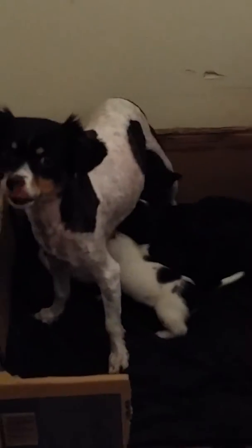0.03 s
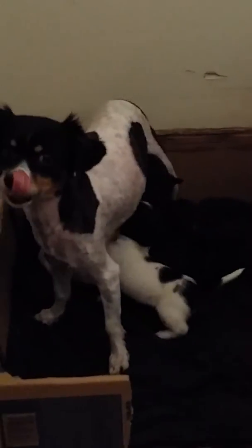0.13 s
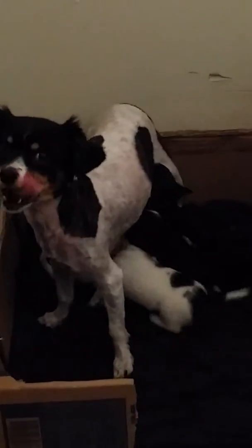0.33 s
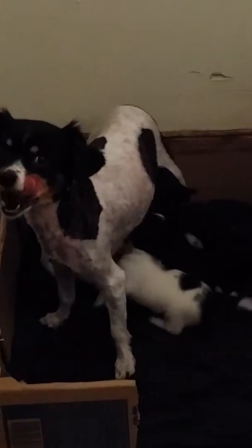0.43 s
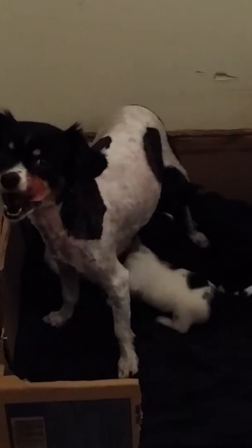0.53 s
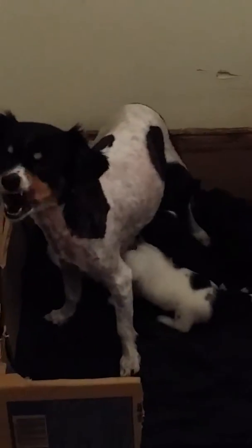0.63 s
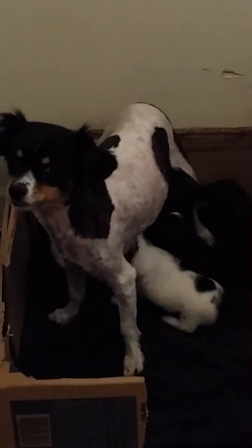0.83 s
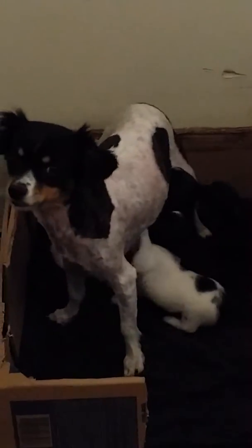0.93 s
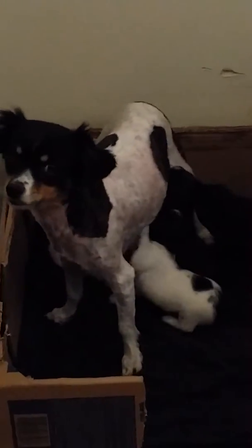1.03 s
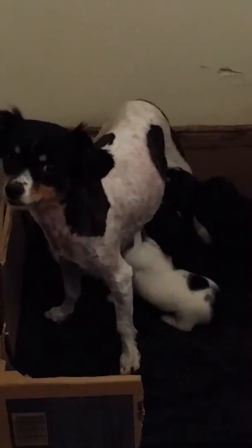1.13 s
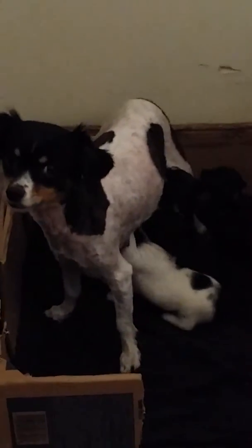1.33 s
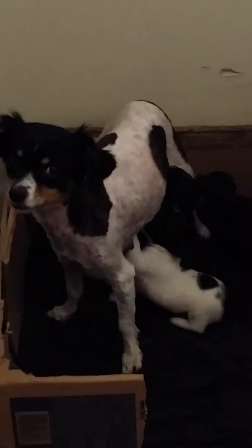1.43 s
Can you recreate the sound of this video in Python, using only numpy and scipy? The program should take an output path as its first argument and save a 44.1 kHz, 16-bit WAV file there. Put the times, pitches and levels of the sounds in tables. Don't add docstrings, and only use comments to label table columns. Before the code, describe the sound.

A puppy gives one high, thin squeal, then snorts a small puff of air indoors

```python
import sys
import numpy as np
from scipy import signal
from scipy.fft import rfft, irfft
from scipy.io import wavfile

SR = 44100
rng = np.random.default_rng(int(sys.argv[2]) if len(sys.argv) > 2 else 0)


def invert_db(x):
    u = np.asarray(x, float) / 20
    return 10 ** u


def wrap_up_sound(samples):
    columns = np.atleast_2d(samples).T
    tamed = np.clip(columns, -1, 1)
    steps = np.round(tamed * 32767).astype(np.int16)
    wavfile.write(sys.argv[1], SR, steps)


N = 66150
T = np.arange(N) / SR
PAN_DB = -3


def rms_one(x):
    return x / np.sqrt(np.mean(x ** 2) + 1e-20)


def in_time(rows):
    s, *columns = np.transpose(rows)
    return [np.interp(T, s, c) for c in columns]


def at_hz(points, hz):
    point_hz, value = np.array(points).T
    return np.interp(np.log(hz), np.log(point_hz), value)


def pan(db):
    return invert_db(np.array([db / 2, -db / 2])).reshape(2, -1)


def drift(rate_hz):
    r = np.exp(-80 * np.pi * rate_hz / SR)
    slow = signal.lfilter([1], [1, -2 * r, r * r], rng.standard_normal(N // 40 + 502))
    slow = slow[500:]
    return np.interp(np.arange(N) / 40, np.arange(len(slow)), rms_one(slow))


# (frequency [Hz], likeness [-1..1])
EAR_LIKENESS = [(30, 0.64), (100, .9), (300, 0.65), (1000, -0.15), (4000, 0.1), (12000, 0.22)]


def noise(spectrum, patchy_db):
    hz = np.maximum(np.fft.rfftfreq(N, 1 / SR), 10)
    alike = np.clip(at_hz(EAR_LIKENESS, hz), -1, 1)
    mid, side = rfft(rng.standard_normal((2, N))) * invert_db(at_hz(spectrum, hz))
    both = np.sqrt(1 + alike) * mid + np.sqrt(1 - alike) * side * [[1], [-1]]
    place = 2 * np.log2(hz / 20)
    shared = drift(6.8)
    out = 0
    for k in range(21):
        band = irfft(both * np.maximum(1 - abs(place - k), 0), N)
        out = out + band * invert_db(patchy_db * (shared + drift(19)))
    return rms_one(out)


def swell(s, attack_s, release_s):
    return np.exp(-.5 * ((T - s) / np.where(T < s, attack_s, release_s)) ** 2)


# (time [s], level [dB], mouth opening [0..1], head turn [-1..1])
SQUEAL_COURSE = [
    (.118, -55, 0.8, -0.7),
    (.185, -48.5, 0.13, -1),
    (.225, -39.5, 0.27, 0.47),
    (.3, -38, 0.11, -0.29),
    (.43, -38, 0.37, 0.18),
    (.54, -37, 0.84, .6),
    (.63, -40, 0.8, 0.17),
    (.675, -44.5, 0.71, -.1),
    (.715, -49.5, 0.7, -.1),
]
# (time [s], second partial [Hz])
SQUEAL_PITCH = [(.118, 1905), (.185, 1926), (.215, 1962), (.258, 1962), (.285, 1941), (.43, 1939),
                (.63, 1928), (.68, 1862), (.715, 1868)]
# (multiple, level [dB], open-mouth gain [dB], left-right [dB], left-right swing with head turn [dB])
SQUEAL_PARTIALS = [(1, -4, 0.6, -1, -4.5), (2, -1.7, -1.5, -15, -8.5), (3, -13, 19.5, -5, -10),
                   (4, -16, 3, -3, -0.5), (5, -20, 18, 2, 3.5), (6, -12.5, -15.5, -4.5, 9),
                   (7, -6.5, -12.5, 9, 1.7), (8, -1.5, -6.5, -5.5, 6.5), (9, -20, 11.5, -5, -4.5),
                   (10, -32.5, 6, 8, -8.4), (11, -32, 2, -11.5, -2.2), (12, -36.5, -0.5, -2.5, -4.3),
                   (13, -32.5, -1.5, -5.5, -7.5), (14, -25, 4.5, -5, -0.7), (15, -29, -2, -2, 1.7)]
# (frequency [Hz], density [dB per Hz])
BREATH_SPECTRUM = [(300, -26), (700, -13), (1300, -0.2), (2500, -2.5), (4000, -14.5), (7500, -1),
                   (11000, -17), (14500, -16.5)]
JITTER, JITTER_RATE_HZ = .0022, 55
SHIMMER, SHIMMER_RATE_HZ = .16, 30
BREATH_DB, BREATH_OPEN_MOUTH_DB = -15, -11
BREAK_S, BREAK_ROUGH, STEADY = .64, 3.5, .5


def squeal():
    (hz,), (db, mouth, turn) = in_time(SQUEAL_PITCH), in_time(SQUEAL_COURSE)
    fade_in = np.clip((T - SQUEAL_COURSE[0][0]) / .01, 0, 1)
    fade_out = np.clip((SQUEAL_COURSE[-1][0] - T) / .01, 0, 1)
    crack = BREAK_ROUGH * np.clip((T - BREAK_S) / .03, 0, 1)
    rough = 1 - STEADY * np.clip(mouth, 0, 1) + crack
    jittered_hz = hz * (1 + JITTER * rough * drift(JITTER_RATE_HZ))
    phase = np.pi * np.cumsum(jittered_hz) / SR
    out = invert_db(BREATH_DB + BREATH_OPEN_MOUTH_DB * mouth) * noise(BREATH_SPECTRUM, patchy_db=1.5) * pan(PAN_DB)
    for k, level_db, open_db, pan_db, turn_db in SQUEAL_PARTIALS:
        k = round(k)
        chance = np.array([drift(SHIMMER_RATE_HZ) + 1j * drift(SHIMMER_RATE_HZ) for ear in "LR"])
        fading = 1 + SHIMMER * np.sqrt(rough * (k - .8)) * chance
        start = rng.uniform(0, 2 * np.pi) + np.array([[0], [1]]) * rng.normal(0, 0.65) * (k - 1)
        tone = np.imag(fading * np.exp(1j * (k * phase + start)))
        gain = np.sqrt(2) * invert_db(level_db + open_db * mouth)
        out = out + gain * pan(pan_db + turn_db * turn) * tone
    return out * invert_db(db) * fade_in * fade_out


# (time [s], level [dB], attack [s], release [s])
PUFF_EVENTS = [
    (0.1446, -53, 0.0029, .012),
    (0.33, -53.5, 0.0151, 0.022),
    (.709, -47.5, 0.0025, 0.023),
    (0.773, -37.5, 0.029, .034),
    (1.026, -57.5, 0.032, .022),
    (1.122, -57, 0.0024, .018),
    (1.48, -65, 0.0026, .03),
]
# (frequency [Hz], density [dB per Hz])
PUFF_SPECTRUM = [(500, -17.5), (1200, -23), (1900, -0.5), (2500, -5.5), (5000, -7), (7600, 2),
                 (12000, -0.3), (14800, -6.5)]


def puffs():
    level = sum(invert_db(db) * swell(s, attack_s, release_s) for s, db, attack_s, release_s in PUFF_EVENTS)
    return level * noise(PUFF_SPECTRUM, patchy_db=1.96) * pan(-7)


WHIMPER_S, WHIMPER_LENGTH_S = 1.02, 0.023
WHIMPER_HZ, WHIMPER_WIDTH_HZ, WHIMPER_DB = 1667, 110, -62


def whimper():
    edges_hz = [WHIMPER_HZ - WHIMPER_WIDTH_HZ / 2, WHIMPER_HZ + WHIMPER_WIDTH_HZ / 2]
    band = signal.butter(2, edges_hz, "band", fs=SR, output="sos")
    air = rms_one(signal.sosfilt(band, rng.standard_normal(N)))
    return invert_db(WHIMPER_DB) * swell(WHIMPER_S, WHIMPER_LENGTH_S, WHIMPER_LENGTH_S) * air * pan(PAN_DB)


# (time [s], peak [dB], frequency [Hz], T60 [s])
THUMP_EVENTS = [(0.076, -47.5, 398, 0.04), (.110, -41.5, 475, .02), (.295, -43.5, 230, 0.088),
                (0.705, -41, 254, 0.099), (.765, -40, 224, 0.055), (0.814, -49.5, 93, 0.25),
                (.925, -47.5, 243, 0.04), (1.115, -54.5, 95.2, .15), (1.415, -55.5, 94, 0.23),
                (1.478, -58.5, 301, 0.031), (1.49, -48, 108, 0.12)]


def thumps():
    out = np.zeros(N)
    for s, db, hz, t60_s in THUMP_EVENTS:
        t = np.maximum(T - s, 0)
        onset = 1 - np.exp(-t * hz * 1.4)
        out += invert_db(db - 60 * t / t60_s) * onset * np.sin(2 * np.pi * hz * t)
    return out * pan(PAN_DB)


# (time [s], peak [dB], frequency [Hz], left-right [dB])
TICK_EVENTS = [
    (.077, -59, 6000, -5),
    (.144, -27, 7260, -13.5),
    (.705, -61, 9000, 1),
    (1.122, -54, 9500, -14),
    (1.45, -52, 2810, -3),
    (1.479, -65, 2100, -8),
]
TICK_WIDTH = .5


def ticks():
    out = np.zeros((2, N))
    for s, db, hz, pan_db in TICK_EVENTS:
        t = np.maximum(T - s, 0)
        decay = np.exp(-np.pi * TICK_WIDTH * hz * t)
        out += invert_db(db) * decay * np.sin(2 * np.pi * hz * t) * pan(pan_db)
    return out


# (time [s], level [dB])
STIR_LEVEL = [(0.0, -57), (0.062, -80.5), (0.082, -55.5), (0.15, -56.5), (0.158, -62.5), (0.284, -61),
              (0.3, -54.5), (0.404, -62.5), (0.55, -54), (0.692, -64.5), (0.706, -44), (0.806, -62),
              (0.818, -56), (0.876, -63), (1.39, -78), (1.5, -66.5)]
# (frequency [Hz], density [dB per Hz])
STIR_SPECTRUM = [(71, -29), (120, -3.5), (188, -7), (236, -1.5), (350, -8.5), (414, -6.5), (900, -15.5),
                 (1170, -51.5), (1980, -120)]


def stirring():
    return invert_db(in_time(STIR_LEVEL)[0]) * noise(STIR_SPECTRUM, patchy_db=3.0) * pan(PAN_DB)


# (time [s], level [dB])
RUMBLE_LEVEL = [(0.0, -61.5), (0.154, -90), (0.182, -69.5), (0.37, -69), (0.454, -60), (0.76, -69),
                (0.834, -54.5), (0.914, -76), (1.082, -68), (1.394, -76), (1.42, -66), (1.5, -71.5)]
# (frequency [Hz], density [dB per Hz])
RUMBLE_SPECTRUM = [(15, -39), (25, -12.5), (27, -17), (102, 2), (130, -3), (170, -28.5), (290, -120)]


def rumble():
    return invert_db(in_time(RUMBLE_LEVEL)[0]) * noise(RUMBLE_SPECTRUM, patchy_db=2.0) * pan(PAN_DB)


# (time [s], level [dB])
RUB_LEVEL = [(0, -65), (.07, -58.5), (.85, -50.5), (.9, -68), (.95, -58), (1.08, -65), (1.19, -61.5),
             (1.24, -81.5), (1.4, -76), (1.5, -64)]
# (frequency [Hz], density [dB per Hz])
CLOTH_SPECTRUM = [(410, -40), (700, -7), (1320, -6.5), (1660, -5.5), (2470, -7.5), (13200, -10.5),
                  (14600, -40)]


def cloth():
    return invert_db(in_time(RUB_LEVEL)[0]) * noise(CLOTH_SPECTRUM, patchy_db=2.5) * pan(PAN_DB)


# (frequency [Hz], density [dB per Hz])
AIR_SPECTRUM = [(25, -4), (100, -4), (450, -19), (900, -14), (2000, -19), (8000, -20.5), (14800, -24)]
AIR_DB, HUM_HZ, HUM_DB = -71, 600, -81.5


def room_air():
    air = invert_db(AIR_DB) * noise(AIR_SPECTRUM, patchy_db=1.4)
    hum = invert_db(HUM_DB) * np.sin(2 * np.pi * HUM_HZ * T)
    return (air + hum) * pan(PAN_DB)


ROOM_DB, ROOM_T60_S, ROOM_LOW_HZ, WALL_HZ = -2.5, .33, 1500, 9000


def room(x):
    t = np.arange(int(.6 * SR)) / SR
    tail = rng.standard_normal((2, len(t))) * invert_db(-60 * t / ROOM_T60_S) * (t > .003)
    tail = signal.sosfilt(signal.butter(1, [ROOM_LOW_HZ, WALL_HZ], "band", fs=SR, output="sos"), tail)
    tail = tail / np.sqrt(np.sum(tail ** 2, axis=1, keepdims=True))
    return invert_db(ROOM_DB) * signal.fftconvolve(tail, x.mean(0)[None], axes=1)[:, :N]


def scene():
    near = squeal() + thumps() + ticks()
    puppy = near + room(near) + puffs() + whimper()
    bedding = stirring() + rumble() + cloth()
    return puppy + bedding + room_air()


def roll_off(x):
    return signal.sosfilt(signal.butter(12, 14800, fs=SR, output="sos"), x)


def record(dry):
    top_hz = 14800 * 1.05
    mix = signal.sosfilt(signal.cheby2(12, 70, top_hz, fs=SR, output="sos"), dry)
    return roll_off(mix)


dry = scene()
out = record(dry)
wrap_up_sound(out)
```